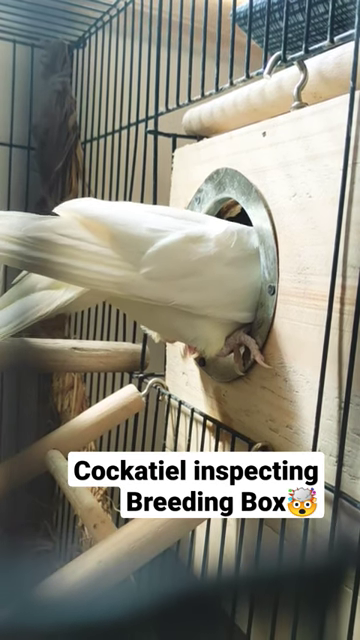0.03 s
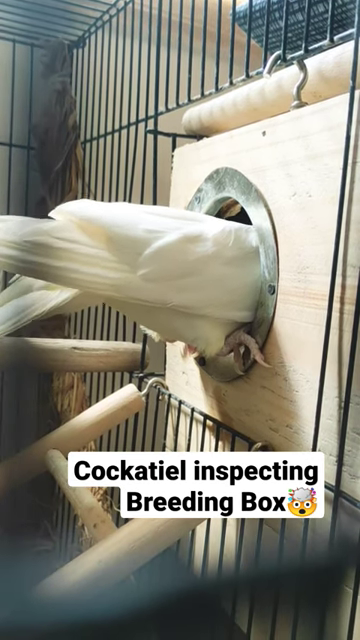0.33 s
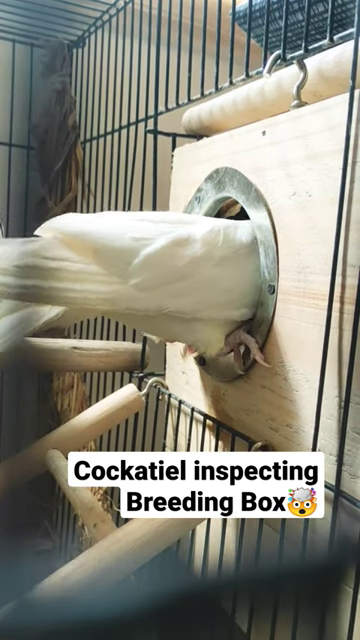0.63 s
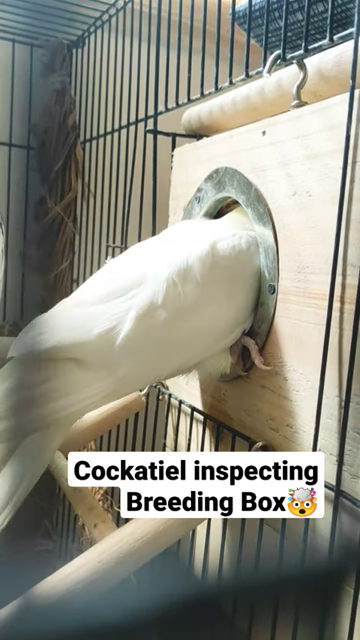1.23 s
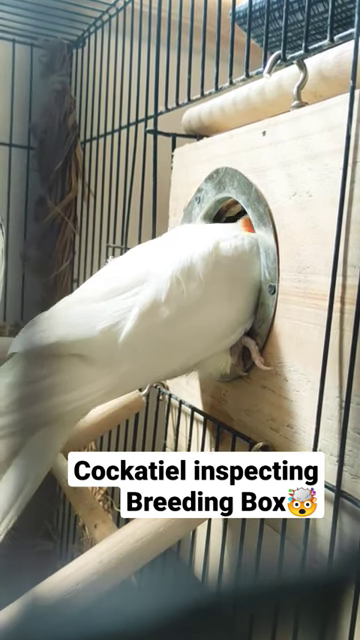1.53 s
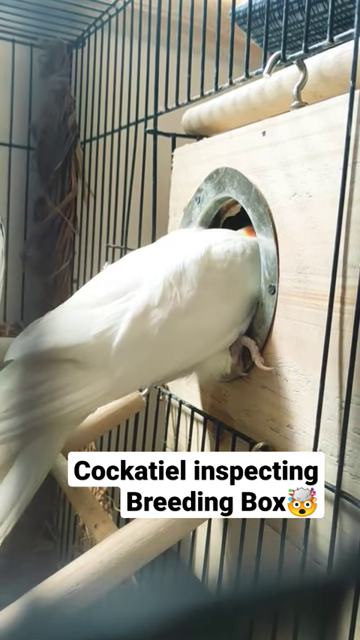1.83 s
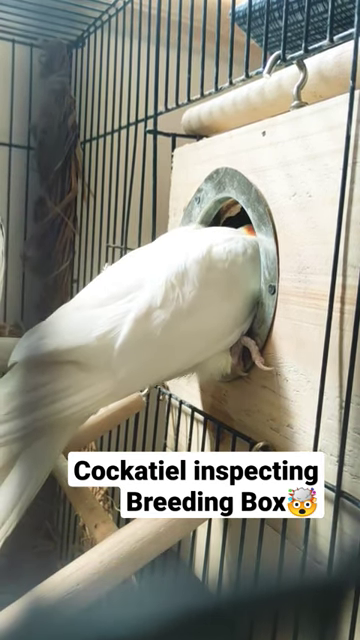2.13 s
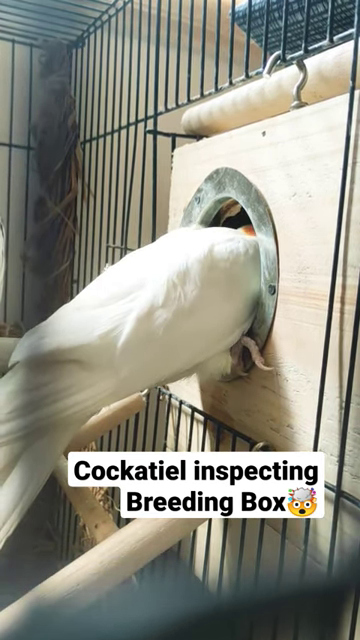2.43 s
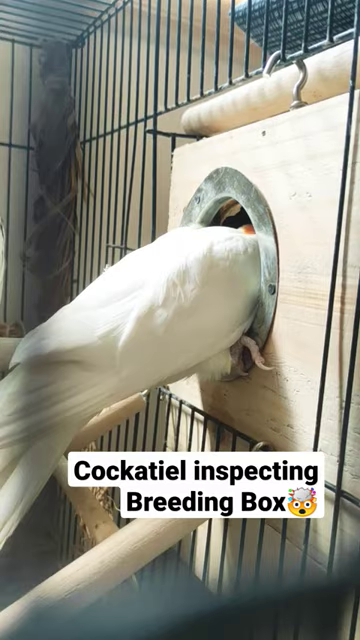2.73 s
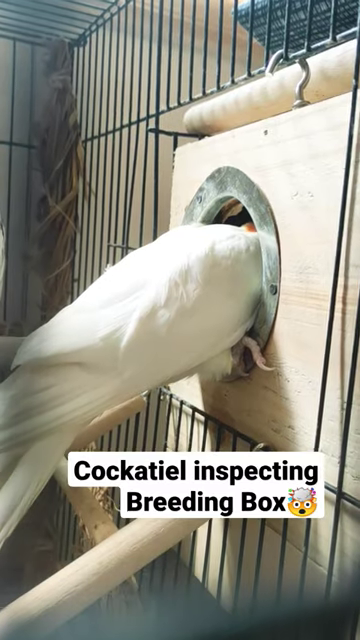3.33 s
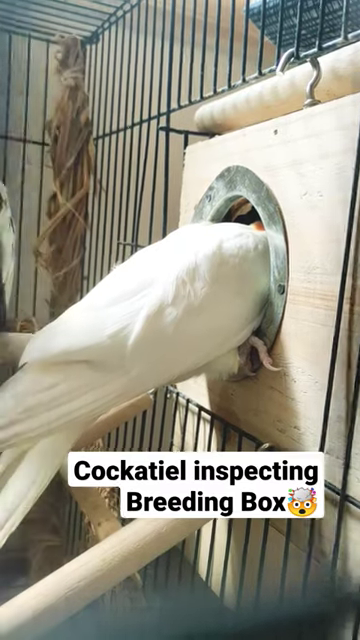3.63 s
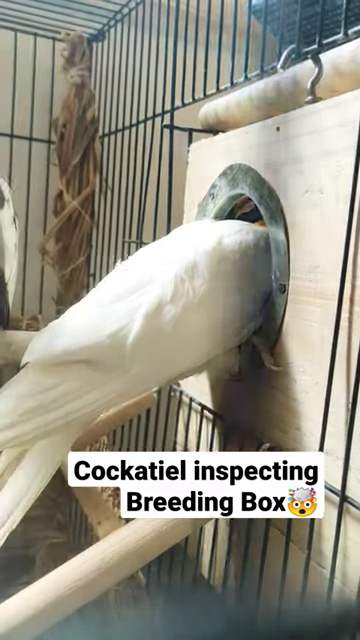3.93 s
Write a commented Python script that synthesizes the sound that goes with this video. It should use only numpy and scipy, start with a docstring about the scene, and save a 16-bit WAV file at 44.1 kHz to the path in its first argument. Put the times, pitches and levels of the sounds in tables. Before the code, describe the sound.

A cockatiel's claws tick on a wooden box, then it chirps four times, softly and hoarsely.

```python
"""Cockatiel at a nest box

A cockatiel leans into a wooden nest box in a quiet room. Its claws tick on the box and its feathers
brush the hole as it shifts its grip. Then it gives four short chirps: the first three start as a
rasping hiss and flick upward, the last is a plain peep. The box and the room echo them. Behind it
are a low hum and a distant rumble that swells and fades in the room's resonances."""
import sys
import numpy as np
from scipy import signal
from scipy.fft import rfft, irfft
from scipy.io import wavfile

SR = 44100
rng = np.random.default_rng(int(sys.argv[2]) if len(sys.argv) > 2 else 0)


def wrap_up_sound(samples):
    """Save the sound to the file named by the first command line argument, as 16-bit audio."""
    columns = np.atleast_2d(samples).T
    # keep every value between -1 and 1, then stretch to whole-number steps
    tamed = np.clip(columns, -1, 1)
    steps = np.round(tamed * 32767).astype(np.int16)
    wavfile.write(sys.argv[1], SR, steps)


N = 176400
T = np.arange(N) / SR

ATTACK_S, CLEARING_S, FLICK_S, RELEASE_S = 0.0069, 0.025, 0.0129, 0.0033
PITCH_SHAKE, LEVEL_SHAKE, SHAKE_HZ = 0.0577, 0.71, 262
# The voice's higher tones: multiple of the pitch, level/dB
VOICE_OVERTONES = [(2, -23), (3, -30), (4, -34.5), (5, -47), (6, -41.5), (7, -44)]
# Throat resonances that lift or damp those tones: f/Hz, width/Hz, gain/dB
THROAT_RESONANCES = [(3180, 370, 11), (4500, 600, -7.5), (5880, 320, 20)]
# The buzz of strong and weak cycles taking turns: multiple of half the pitch, level/dB
BUZZ_TONES = [(1, -6.5), (3, 6.5), (4, -3.5), (5, -2)]
# Tone colour of the rasping hiss: f/Hz, level/dB
RASP_COLOUR = [(300, -13), (620, -4), (1000, -2.5), (1350, 3), (1700, -5.5), (2050, -1.5), (2350, -14),
               (2650, -9), (3200, -11), (3900, -25), (6000, -19.5), (7200, -21.5), (8800, -21),
               (10500, -63), (13000, -49)]
# How buzz and rasp swell and fade: share of the chirp's length, gain/dB
BUZZ_SWELL = [(0, -20), (.35, -20), (.52, -4), (.72, -5), (.88, -21), (1.1, -27)]
RASP_SWELL = [(0, -17.5), (.3, -6), (.6, 1.5), (.85, -2.5), (1.1, -9), (1.45, -15.5)]
# The chirps: t/s, length/s, tone/dB, f/Hz, sag and rise (shares of f), rasp/dB, buzz/dB,
# roughness (0-1), clear by (share of length), tone gain until then/dB, rasp treble/dB, overtones/dB
CHIRP_NOTES = [(1.76, .06, -39, 1319, .06, 0.22, -48.5, -44, 0.39, 0.82, -11.5, 1.5, 2.5),
               (2.255, .067, -39, 1332, .02, 0.21, -49.5, -50, 0.92, 0.76, -14.5, -4, -3.5),
               (2.667, .049, -40, 1247, 0.119, 0.066, -50.5, -64, 0.6, 0.65, -15, -3, -6),
               (3.054, 0.037, -39.5, 1192, 0, 0.014, -61, -64, 0.74, 0.56, -4.5, 4, -3)]
def chirp(length, tone_db, hz, sag, rise, rasp_db, buzz_db, rough, clear_by, held_db, treble_db,
          overtone_db):
    """A shaky, hissing voice sags and buzzes at half its pitch, then clears and flicks up as it fades."""
    t = np.arange(0, length + .03, 1 / SR)
    progress, size = t / length, len(t)
    clear = np.clip(1 + (t - clear_by * length) / CLEARING_S, 0, 1)
    shaky = rough * (1 - .77 * clear)
    past_release = t - length + RELEASE_S
    flick = np.sin(np.clip(1 + past_release / FLICK_S, 0, 1) * np.pi / 2) ** 2
    high_start = sag * np.maximum(1 - (progress / .687) ** 2, 0)
    pitch = hz * (1 + high_start + rise * flick + PITCH_SHAKE * shaky * wander(SHAKE_HZ, size))
    phase = 2 * np.pi * np.cumsum(pitch) / SR
    release = np.exp(-np.maximum(past_release, 0) / RELEASE_S)
    effort = np.minimum(t / ATTACK_S, 1) * amp(held_db * (1 - clear) - flick) * release
    brightness = (release * (clear + .3) / 1.3) ** .68  # overtones grow as the voice clears
    tone = np.sin(phase)
    for k, db in VOICE_OVERTONES:
        lift = sum(peak / (1 + ((k * pitch - f) / width) ** 2) for f, width, peak in THROAT_RESONANCES)
        tone += amp(db + lift + overtone_db) * brightness * np.sin(k * phase)
    flutter = 1 + LEVEL_SHAKE * shaky * wander(SHAKE_HZ, size)
    tone = unit(tone) * flutter * effort * amp(tone_db)
    buzz = unit(sum(amp(db) * np.sin(k * phase / 2) for k, db in BUZZ_TONES))
    buzz *= amp(buzz_db + curve(BUZZ_SWELL, progress))
    colour = [(f, db + treble_db * (f > 3000)) for f, db in RASP_COLOUR]
    puffs = (1 + .59 * np.sin(phase / 2)) * amp(1.1 * wander(SHAKE_HZ, size))
    rasp = unit(hiss(colour, size) * puffs) * amp(rasp_db + curve(RASP_SWELL, progress))
    return tone + buzz + rasp


# Which side the voice is louder on: f/Hz, left minus right/dB
VOICE_BALANCE = [(700, -2), (1300, 4.5), (1650, 7.5), (2100, -7), (3200, -4), (4500, -8), (6200, -2.5),
                 (9000, 0)]
def place_voice(voice, left_lag_s=0.00023):
    """The voice reaches the left slightly later, and each side colours it differently."""
    hz = np.fft.rfftfreq(N, 1 / SR)
    side = amp(spectrum(VOICE_BALANCE, hz) / 2)
    lag = np.exp(-2j * np.pi * hz * left_lag_s)
    return irfft(rfft(voice) * np.array([side * lag, 1 / side]), N)


# Tone colour of a tick: f/Hz, level/dB
TICK_COLOUR = [(400, 3), (1200, -1.5), (1800, -6.5), (2900, 2), (4000, -1), (4900, -9), (6300, 4.5),
               (7000, 1), (7600, 3.5), (9000, -5.5), (10200, -14), (13000, -27)]
# Claw ticks: t/s, level/dB, left minus right/dB, time to fade by 60 dB/s
CLAW_TICKS = [(0.8234, -56.5, -8.5, 0.052), (.905, -70, -12, .03), (0.917, -68, -6, .04),
              (0.961, -56, -6, 0.058), (0.9972, -65.5, -10, .06), (1.016, -69, -4, .05),
              (1.1415, -72, -10, .03), (1.353, -55.5, -4.5, 0.072), (1.376, -61, -6, 0.044),
              (1.5276, -73, -8, .03)]
def claws(rise_s=0.0015):
    """Each tick is a brief catch of a claw, dying away in the wood."""
    out, t = np.zeros((2, N)), np.arange(4096) / SR
    for start, db, side_db, fade_s in CLAW_TICKS:
        loudness = np.minimum(t / rise_s, 1) * amp(db - 60 * t / fade_s)
        add(out, start, hiss(TICK_COLOUR, len(t)) * loudness * pan(side_db))
    return out


# Tone colour of the feathers: f/Hz, level/dB
FEATHER_COLOUR = [(800, -13.5), (2800, 5), (5000, -5), (6800, 3), (7700, 9.5), (9000, -7), (11000, -9)]
# How loudly they brush: t/s, level/dB
BRUSH_LEVEL = [(0, -83), (.14, -86), (.22, -78.5), (.33, -87), (.8, -88), (1.02, -73), (1.06, -79.5),
               (1.16, -75.5), (1.32, -85), (1.7, -99), (4, -83.5)]
def feathers():
    """Feathers brush the rim of the hole with a faint, grainy hiss."""
    grainy = hiss(FEATHER_COLOUR, N) * amp(2.2 * wander(70, N))
    return unit(grainy) * amp(curve(BRUSH_LEVEL, T)) * pan(-2.5)


# Dull knocks of the foot: t/s, level/dB
FOOT_KNOCKS = [(.998, -62), (1.018, -60), (1.379, -56)]
# The notes of the box wall: f/Hz, gain/dB, time to fade by 60 dB/s
WALL_NOTES = [(780, -5.5, 0.055), (1053, -4, 0.042), (1340, -7, 0.053)]
def knocks(blows, notes, rise_s):
    """Each blow makes the wooden box ring with the same few notes."""
    out, t = np.zeros((2, N)), np.arange(SR // 2) / SR
    for start, level in blows:
        ring = sum(amp(level + db - 60 * t / fade_s) * np.sin(2 * np.pi * (hz * t + rng.random()))
                   for hz, db, fade_s in notes)
        add(out, start, ring * np.minimum(t / rise_s, 1) * pan(6.4))
    return out


# The low notes of the box: f/Hz, gain/dB, time to fade by 60 dB/s
BOX_NOTES = [(167.3, -0.71, 0.32), (244.4, 0, 0.33), (365.2, 0.21, 0.16)]
# Soft pushes on the box: t/s, level/dB, most stirred f/Hz
PUSHES = [(.712, -44, 352), (1.185, -44.5, 340), (2.115, -41.5, 162), (2.485, -39, 207), (2.68, -36.5, 370),
          (3.025, -43, 367)]
def bumps(reach_octaves=0.24):
    """Each soft push rings the low notes nearest to its own pitch."""
    out = 0
    for start, level, push_hz in PUSHES:
        notes = [(hz, db - 10 * np.log10(1 + (np.log2(hz / push_hz) / reach_octaves) ** 4), fade_s)
                 for hz, db, fade_s in BOX_NOTES]
        out += knocks([(start, level)], notes, rise_s=0.021)
    return out


# Single bounces of the voice: delay/s, gain/dB, left minus right/dB
BOUNCES = [(.0105, -14, 6), (.045, -22, -0.5)]
def close_echoes(voice):
    """The voice rings briefly in the box and bounces back twice."""
    out = amp(-16) * echo(voice, [(1000, .06)])  # every pitch fades in 0.06 s
    for delay, db, side_db in BOUNCES:
        add(out, delay, amp(db) * pan(side_db) * voice)
    return out


# How long the room rings: f/Hz, time to fade by 60 dB/s
ROOM_FADE = [(300, 0.22), (1100, 0.3), (1600, 0.37), (3000, 0.36), (9000, 0.1)]
def echo(sound, fade_times):
    """Many tiny reflections blur into a tail, each pitch dying at its own speed."""
    shape = (2, SR // 2)
    taps = rng.choice([-1., 1.], shape) * (rng.random(shape) < 3000 / SR)
    hz, t, bands = signal.stft(taps, SR, nperseg=128)
    fade = amp(-60 * t / spectrum(fade_times, hz)[:, None])
    tail = signal.istft(bands * fade, SR, nperseg=128)[1]
    tail /= np.linalg.norm(tail, axis=1, keepdims=True)
    return signal.fftconvolve(sound, tail, axes=1)[:, :N]


# The hum's slow drift: t/s, gain/dB
HUM_SWELL = [(0, -0.5), (.7, -2.5), (1.5, -7.5), (2.1, -3), (2.6, -0.5), (3.2, 1), (3.7, -5.5), (4, -7)]
def hum(hz=60.06, waver=.28, waver_hz=8.9):
    """One low tone wavers a little in loudness and pitch."""
    phase = 2 * np.pi * hz * T
    tone = np.sin(phase) * (1 + waver * wander(waver_hz, N))
    tone += np.cos(phase) * waver * wander(waver_hz, N)
    return unit(tone) * amp(-53.5 + curve(HUM_SWELL, T)) * pan(7.7)


# The room's resonances, the pitches it rings at: f/Hz, width/Hz, level/dB
ROOM_NOTES = [(164.8, 6.3, -60), (191.2, 11, -67), (223.7, 17, -65.5), (244.7, 6.6, -63.5), (272, 33, -68),
              (350, 26, -60), (368.3, 7.3, -60.5), (428, 63, -71.5), (536, 42.6, -69.5), (723, 61, -71.5)]
# How the rumble swells: t/s, gain below 300 Hz/dB, gain above/dB
RUMBLE_SWELL = [(0, -11, -8), (.55, -5.5, -7), (.75, -5, -3), (1.6, -2, 0.5), (2.1, 1, 2), (2.4, 4, 1),
                (2.72, 1.5, 3), (3.1, 2.5, 0), (3.5, 0, -5), (4, -1, 2.5)]
def rumble():
    """A distant rumble stirs the room's resonances."""
    out = 0
    for hz, width, db in ROOM_NOTES:
        swell_db = curve(RUMBLE_SWELL, T, column=1 if hz < 300 else 2)
        out += amp(db + swell_db) * surrounding_noise(lambda f: 1 / (1 + ((f - hz) / width) ** 2))
    return out


# How loud the handling is: t/s, level/dB
HANDLING_LEVEL = [(0, -76), (.12, -72), (.17, -57), (.36, -58), (.48, -70), (.6, -58), (.68, -74), (4, -76)]
def handling():
    """Soft handling makes a very deep rumble, mostly in the first second."""
    deep = surrounding_noise(lambda f: f / (10 + f) / (1 + (f / 35) ** 3))
    return amp(curve(HANDLING_LEVEL, T)) * deep


# Tone colour of the quiet room: f/Hz, level/dB
HUSH_COLOUR = [(8, -31.5), (25, -11), (42, -2), (85, 2.5), (120, -7.5), (300, -9), (600, -14.5),
               (1000, -22), (2000, -29.5), (4000, -37.5), (6000, -38), (7800, -36.5), (9000, -36.5),
               (10000, -45), (12500, -44.5)]
def room_hush():
    """A steady, faint noise, strongest in the bass."""
    return amp(-59.5) * surrounding_noise(lambda f: amp(spectrum(HUSH_COLOUR, f)))


# How the background spreads: f/Hz, likeness of the two sides (0-1), left minus right/dB
STEREO_SPREAD = [(60, 1, 2.5), (120.6, 0.76, -1.5), (226, 0.95, 7.5), (405, 0.6, 8.5), (837, 0, 1.5),
                 (1640, 0, 3.5), (3200, 0.017, 0), (6460, 0.047, -1.5), (12000, 0, 1)]
def surrounding_noise(gain):
    """Noise from all around, shaped by gain(Hz); the two sides are most alike in the bass."""
    hz = np.fft.rfftfreq(N, 1 / SR)
    left, other = rfft(rng.standard_normal((2, N)))
    alike = spectrum(STEREO_SPREAD, hz)
    side = amp(spectrum(STEREO_SPREAD, hz, column=2) / 2)
    right = alike * left + np.sqrt(1 - alike ** 2) * other
    return unit(irfft(np.array([left * side, right / side]) * gain(hz), N))


def hiss(colour, size):
    """Two unrelated channels of coloured noise."""
    hz = np.fft.rfftfreq(size, 1 / SR)
    return unit(irfft(rfft(rng.standard_normal((2, size))) * amp(spectrum(colour, hz)), size))


def wander(rate_hz, size):
    """Random motion up to about the given rate."""
    hz = np.fft.rfftfreq(N, 1 / SR)
    return unit(irfft(rfft(rng.standard_normal(N)) / (1 + (hz / rate_hz) ** 4), N))[:size]


def amp(db):
    """Turns decibels into a gain."""
    return 10 ** (np.asarray(db) / 20)


def unit(x):
    """Scales to an average strength (rms) of one."""
    return x / np.sqrt(np.mean(abs(x) ** 2) + 1e-20)


def curve(points, at, column=1):
    """Reads a table, joining its points with straight lines."""
    columns = np.transpose(points)
    return np.interp(at, columns[0], columns[column])


def spectrum(points, hz, column=1):
    """Reads a table by frequency, with octaves evenly spaced."""
    columns = np.transpose(points)
    return np.interp(np.log(hz + 1), np.log(columns[0] + 1), columns[column])


def pan(db):
    """Left and right gains; positive leans left."""
    return amp(np.array([[db], [-db]]) / 2)


def add(mix, start_s, sound):
    """Lays a sound into the mix."""
    part = mix[:, round(start_s * SR):][:, :sound.shape[1]]
    part += sound[:, :part.shape[1]]


def scene():
    """The bird shifts and calls into the box; the room answers."""
    voice = np.zeros((2, N))
    for start, *settings in CHIRP_NOTES:
        add(voice, start, chirp(*settings))
    voice = place_voice(voice)
    bird = voice + claws() + feathers() + knocks(FOOT_KNOCKS, WALL_NOTES, rise_s=0.0015) + bumps()
    echoes = close_echoes(voice) + amp(-18.5) * pan(5) * echo(bird, ROOM_FADE)
    return bird + echoes + room_hush() + hum() + rumble() + handling()


def record(dry):
    """Cuts the highest treble, above 12700 Hz."""
    low_pass = signal.firwin(511, 12700, window=("kaiser", 9), fs=SR)
    return signal.oaconvolve(dry, low_pass[None], "same")


dry = scene()
out = record(dry)
wrap_up_sound(out)
```